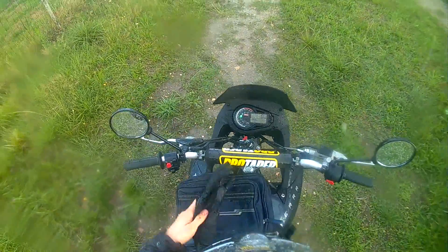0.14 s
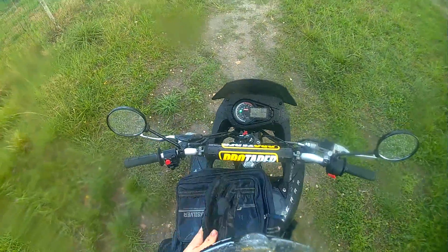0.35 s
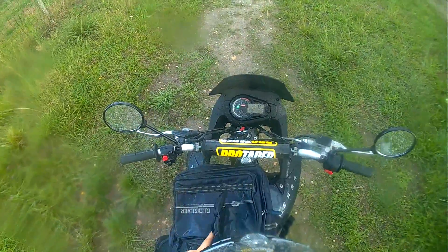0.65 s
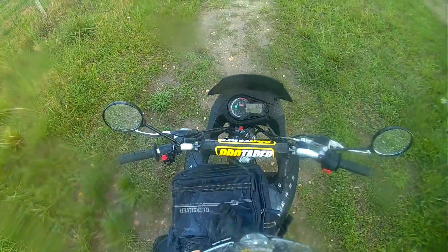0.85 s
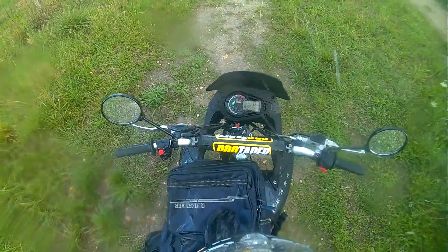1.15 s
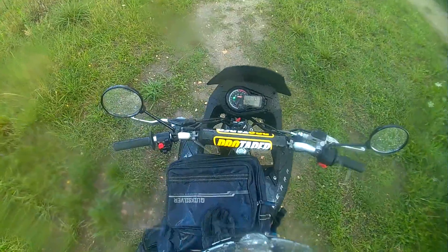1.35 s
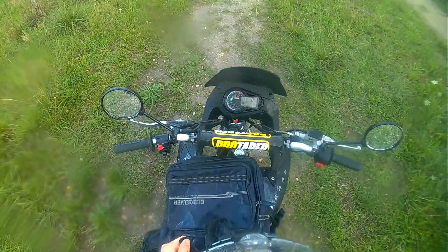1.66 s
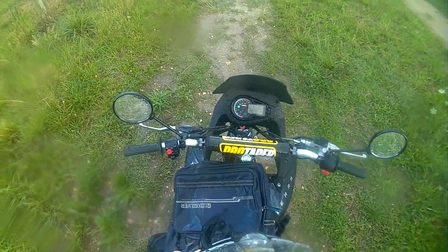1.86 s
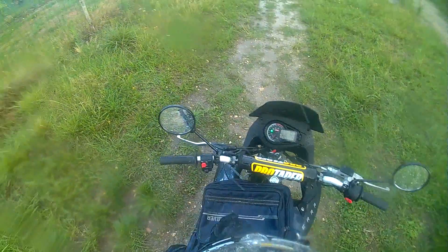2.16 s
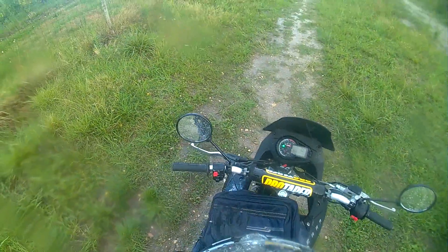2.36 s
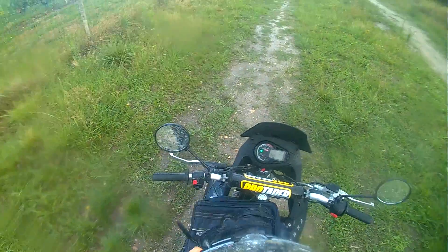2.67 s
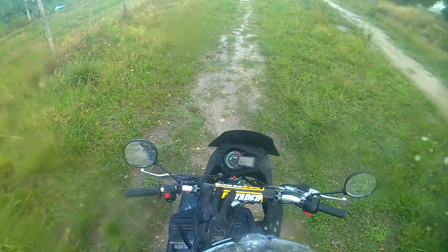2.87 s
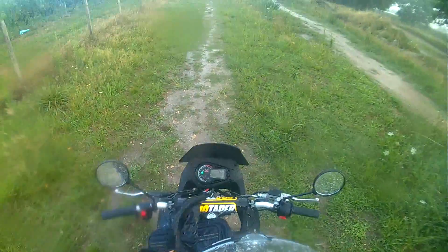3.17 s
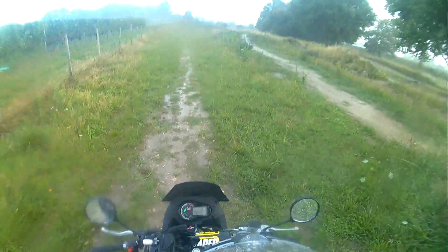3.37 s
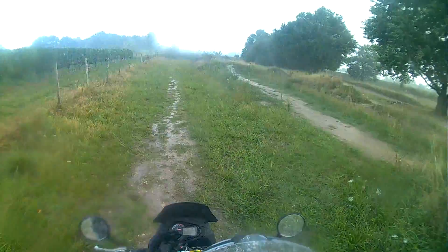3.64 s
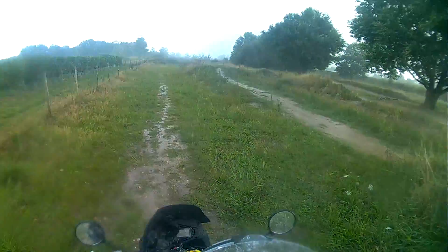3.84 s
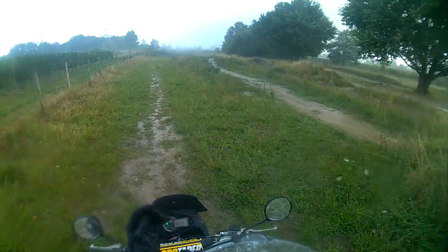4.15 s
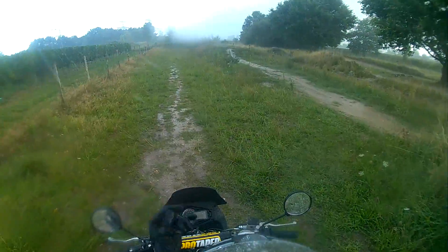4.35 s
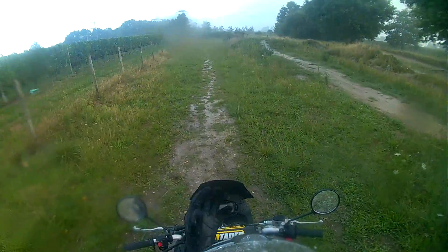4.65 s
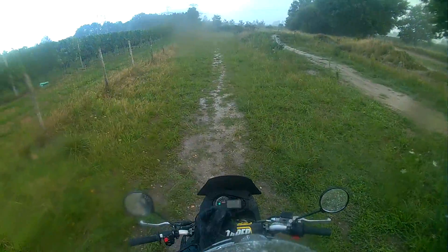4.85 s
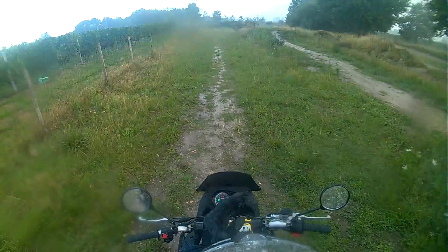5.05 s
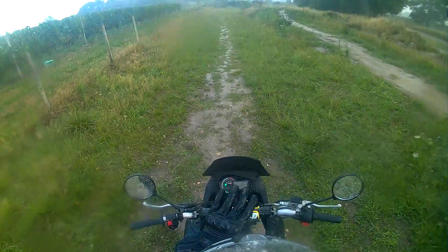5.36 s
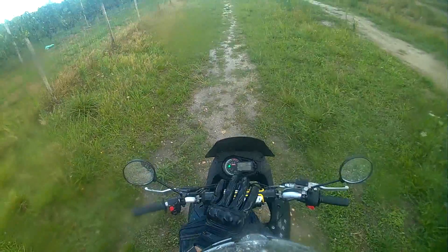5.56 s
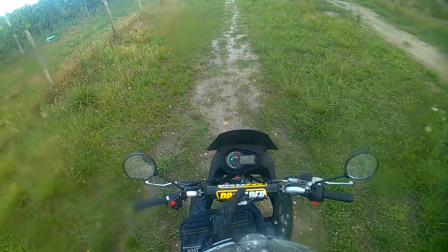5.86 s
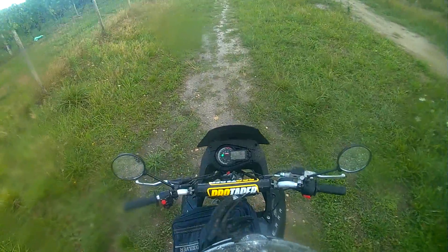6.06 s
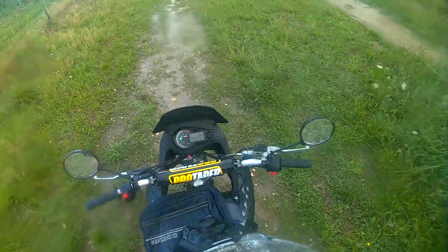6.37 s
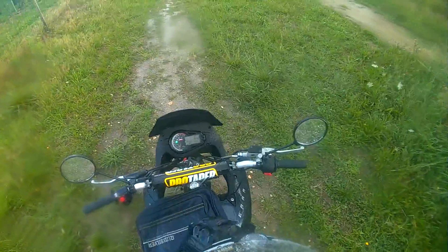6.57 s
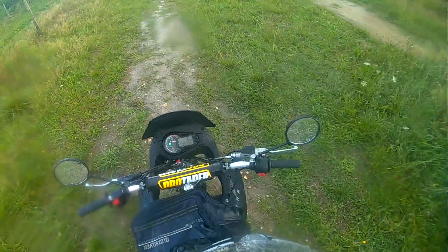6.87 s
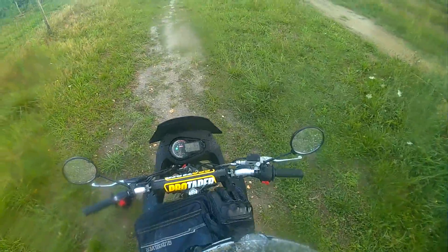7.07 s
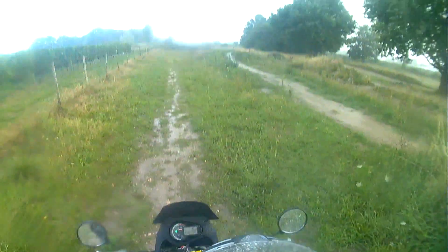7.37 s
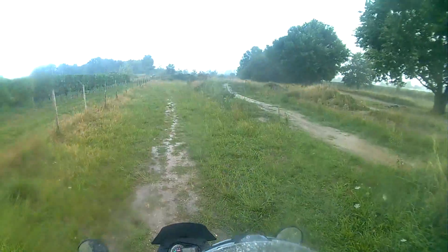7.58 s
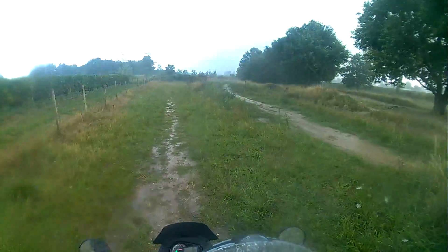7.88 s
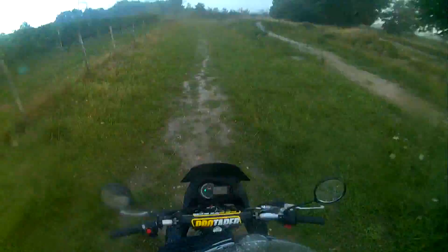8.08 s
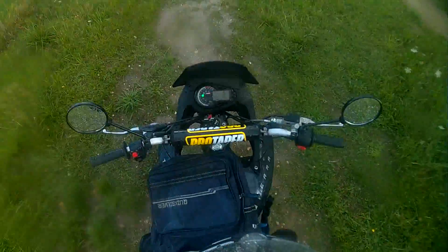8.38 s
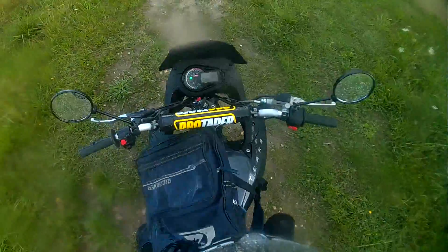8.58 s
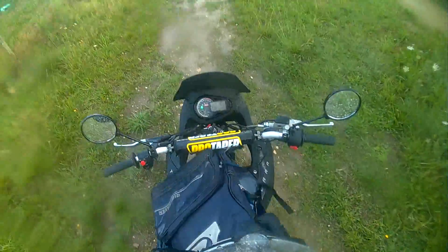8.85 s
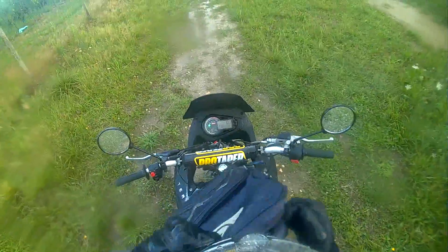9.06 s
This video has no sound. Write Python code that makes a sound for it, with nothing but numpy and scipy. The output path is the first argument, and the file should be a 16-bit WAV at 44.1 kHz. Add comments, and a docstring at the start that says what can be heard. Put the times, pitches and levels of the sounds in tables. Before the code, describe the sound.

A close, boxy shower of raindrops: resonant knocks on a helmet shell, sharper clicks on a plastic case, and low thuds under the heaviest drops. It peaks around two seconds, becomes thinner and softer through the middle, and ends as scattered tiny taps. Beneath lies a faint, dull, constant hiss of rain on a field. The sealed microphone removes most treble; the standing motorcycle is silent.

```python
"""In the open beside a field, rain strikes a rider's helmet and the waterproof camera case fixed to it.
Drops on the helmet excite the modes of its shell, with an overload thud under loud ones; drops on the
case give short hard ticks with a small thump. The crackling shower thins out to single taps
over a faint, steady wash of rain on grass. All of it is muffled by the case; the motorcycle stands silent."""
import sys
import numpy as np
from scipy import signal
from scipy.fft import rfft, irfft
from scipy.io import wavfile
from scipy.ndimage import uniform_filter1d, minimum_filter1d

SR = 44100
rng = np.random.default_rng(int(sys.argv[2]) if len(sys.argv) > 2 else 0)


def unload_audio(sound):
    """Save the sound as a 16-bit wav file, at the path given as the first command line argument."""
    columns = np.transpose(np.atleast_2d(sound))
    # keep every value between -1 and 1, then stretch to whole-number steps
    steps = np.round(np.clip(columns, -1, 1) * 32767)
    wavfile.write(sys.argv[1], SR, steps.astype(np.int16))


N = 406590
TAP_SIZE = 3072  # length of one tap [samples]


def amp(db):
    """Level law: converts decibels to an amplitude gain."""
    return 10 ** (np.asarray(db) / 20)


def read_spectrum(points, hz):
    """Spectral interpolation: joins levels in dB by straight lines on a log-frequency axis."""
    f, db = np.transpose(points)
    return np.interp(np.log(hz + 1), np.log(f + 1), db)


def unit(tap):
    """Energy normalisation: scales a tap to the energy of 10 ms at rms 1."""
    return tap / np.sqrt(np.sum(tap ** 2) / (SR / 100) + 1e-20)


def add(mix, time_s, sound):
    """Superposition: adds a sound to the mix in place, from the given time."""
    part = mix[max(round(time_s * SR), 0):][:len(sound)]
    part += sound[:len(part)]


def causal_response(points, patchy_db=0, fizz_db=0):
    """Minimum phase: the response starts sharply and rings afterwards; its spectrum varies at random."""
    hz, db = np.transpose(points)
    db = db + patchy_db * rng.standard_normal(len(hz))
    db = db + fizz_db * (hz > 5000)
    bins = abs(np.fft.fftfreq(TAP_SIZE, 1 / SR))
    log_gain = np.log(amp(read_spectrum(np.c_[hz, db], bins)))
    # the Hilbert transform of the log gain gives the phase
    return np.exp(np.conj(signal.hilbert(log_gain)))[:TAP_SIZE // 2 + 1]


def splash(decay_s, spray_db):
    """Impact force as a spectrum: an impulse, then a short noise that swells as the water spreads."""
    t = np.arange(TAP_SIZE) / SR
    spray = rng.standard_normal(TAP_SIZE) * np.sqrt(t) * np.exp(-t / decay_s)
    spray /= np.linalg.norm(spray)
    return rfft(t == 0) + amp(spray_db) * rfft(spray)


# Spectrum of rain on the field, heard through the case: (frequency [Hz], relative density [dB per Hz])
WASH_SPECTRUM = [(25, -31), (150, -19), (550, -2.5), (1100, 2), (2000, -6.5), (2400, -22.5), (2900, -35),
                 (4100, -31), (5000, -49), (15000, -49)]


def wash(level_db=-57):
    """Incoherent summation: countless far drops merge into a dull, even hiss of filtered noise."""
    gain = amp(read_spectrum(WASH_SPECTRUM, np.fft.rfftfreq(N, 1 / SR)))
    hiss = irfft(rfft(rng.standard_normal(N)) * gain, N)
    return amp(level_db) * hiss / hiss.std()


# Strength of the shower, its loudest patter before flurries: (time [s], level [dB])
SHOWER_STRENGTH = [(0, -18.5), (0.22, -28), (0.45, -24), (1.3, -28), (1.55, -20.5), (2.75, -25.5),
                   (2.82, -31.5), (3.1, -27), (4.3, -35.5), (4.55, -30.5), (5.6, -38.5), (6.4, -37),
                   (6.9, -42), (9.2, -42.5)]


def shower_patter(full_db=-21, halving_db=15, range_db=24, flurry_db=2.5, slot_s=.007):
    """Random arrivals: at most one drop a slot, in flurries, sparser and softer as the shower eases."""
    out = np.zeros(N)
    # the drop levels given here set only the treble, since each tap is normalised
    on_helmet = [unit(helmet_tap(-32.5, -6 + 6 * z)) for z in rng.standard_normal(100)]
    on_case = [unit(case_tap(-30.5, 1530 * np.exp(.24 * z))) for z in rng.standard_normal(20)]
    chance, delay, smallness, place, aim = rng.random((int(N / SR / slot_s), 5)).T
    times = (np.arange(len(chance)) + delay) * slot_s
    flurry = uniform_filter1d(rng.standard_normal(len(times)), size=4)
    top_db = np.interp(times, *np.transpose(SHOWER_STRENGTH))
    top_db += flurry_db * np.tanh(flurry / flurry.std())
    # the chance of a drop halves for each halving_db below full_db
    lands = chance < 2 ** ((top_db - full_db) / halving_db)
    for i in np.flatnonzero(lands):
        db = top_db[i] - range_db * smallness[i]
        # a fifth of the louder ones are direct hits on the case
        taps = on_case if db > -34 and aim[i] < .2 else on_helmet
        add(out, times[i], amp(db) * taps[int(place[i] * len(taps))])
    return out


# Spectrum of the low thump: (frequency [Hz], relative level [dB])
THUMP_SPECTRUM = [(20, -39), (130, -8.5), (240, -2.5), (600, 6.5), (1000, -12), (2500, -53), (5000, -81.5)]


def low_thump(force, patchy_db):
    """Forced response: the force of the splash is filtered to a dull thump."""
    return unit(irfft(force * causal_response(THUMP_SPECTRUM, patchy_db)))


# Spectrum of the tick at the usual 1530 Hz centre: (frequency [Hz], relative level [dB])
TICK_SPECTRUM = [(60, -43.5), (400, -16), (800, -6), (1250, 4.5), (1600, 2), (2100, -7.5), (2850, -31),
                 (3400, -25), (4000, -29.5), (4650, -43), (5100, -66), (7000, -61.5), (9500, -49),
                 (15000, -71)]


def case_tick(force, shift, ring_hz=1690, ring_t60=.017, ring_db=-7):
    """Impact and resonance: a hard tick with one brief mode; the landing place shifts both in pitch."""
    t = np.arange(TAP_SIZE) / SR
    hz, db = np.transpose(TICK_SPECTRUM)
    # only the part below 2500 Hz moves in full, the mode by the square root
    moved_hz = hz * shift ** (hz < 2500)
    response = causal_response(np.c_[moved_hz, db], patchy_db=3.5)
    mode = amp(-60 * t / ring_t60) * np.cos(2 * np.pi * ring_hz * np.sqrt(shift) * t)
    tick = unit(irfft(force * response))
    ring = unit(irfft(rfft(mode) * response))
    return unit(tick + amp(ring_db) * ring)


def case_tap(db, centre_hz, usual_hz=1530, gain_db=3):
    """Direct impact: tick and thump of the case, with a weaker tap of the helmet beneath it."""
    shift = centre_hz / usual_hz
    force = splash(decay_s=.0012, spray_db=-1)
    # where the wall is softer the tick is lower and thumps more
    thump_db = -16.5 - 7 * np.log2(shift)
    hit = case_tick(force, shift) + amp(thump_db) * low_thump(force, patchy_db=2.5)
    return amp(db + gain_db) * hit + helmet_tap(db - 16, bright_db=-6)


# Drops heard singly on the camera case: (time [s], level over 10 ms before the 3 dB gain of case_tap [dB],
# nominal centre of the tick [Hz])
SINGLE_CASE_DROPS = [(0.761, -10.5, 1430), (0.92, -20.5, 1490), (0.967, -15, 1580), (1.142, -25, 1494),
                     (1.501, -18, 1510), (1.635, -22.5, 1700), (1.709, -20, 1630), (1.803, -24.5, 1490),
                     (2.057, -15, 1530), (2.36, -24.5, 1670), (2.404, -7, 1580), (2.668, -13, 1490),
                     (3.165, -25.5, 1550), (3.458, -20, 1530), (3.651, -25.5, 1400), (3.77, -25, 1350),
                     (3.954, -29.5, 1540), (4.121, -29.5, 1890), (4.268, -25, 1540), (4.485, -24, 1450),
                     (4.661, -27.5, 1520), (4.734, -20, 1670), (4.924, -30, 1490), (5.216, -36, 1500),
                     (5.223, -23.5, 1560), (5.498, -27, 1715), (5.763, -28, 1830), (6.026, -30, 1190),
                     (6.046, -33.5, 1890), (6.102, -28.5, 1420), (6.224, -30, 1390), (6.364, -34.5, 1480),
                     (7.311, -31, 1650), (7.313, -26.5, 1230), (7.564, -31, 1350), (8.775, -35.5, 1510),
                     (9.094, -31.5, 1480), (9.179, -29.5, 1540)]


def single_case_drops():
    """Superposition of direct impacts: drops heard singly on the case itself."""
    out = np.zeros(N)
    for time_s, db, centre_hz in SINGLE_CASE_DROPS:
        add(out, time_s, case_tap(db, centre_hz))
    return out


def case_wall(ring, low_hz=480, high_hz=2400):
    """Transmission: the case lets only the middle of the shell's ring through."""
    return signal.lfilter(*signal.butter(3, [low_hz, high_hz], "bandpass", fs=SR), ring)


# Modes of the helmet shell before detuning and tilt: (frequency [Hz], relative level [dB], t60 [s])
SHELL_MODES = [(836.3, -8.5, 0.08), (938.5, -3.5, 0.079), (1010, -3, 0.069), (1106.3, 2.5, 0.059),
               (1183.4, 0.5, 0.037), (1233, -3.5, 0.027), (1302.5, -4.5, 0.064), (1740, -33.5, 0.014),
               (1900, -26, 0.082), (1850, -11.5, 0.083), (2240, 0.5, 0.016)]


def shell_ring(bright_db, scatter=.012, upper_share=.65):
    """Modal synthesis: decaying sines, each excited and detuned according to the landing place."""
    t = np.arange(TAP_SIZE) / SR
    hz, mode_db, t60 = np.transpose(SHELL_MODES)[:, :, None]
    place, detune = rng.standard_normal((2, len(SHELL_MODES), 1))
    # brighter drops favour the upper modes
    tilt_db = upper_share * bright_db * np.log2(hz / hz[0])
    strength = np.tanh(2 * place) * amp(mode_db + tilt_db)
    modes = strength * amp(-60 * t / t60) * np.sin(2 * np.pi * hz * (1 + scatter * detune) * t)
    return unit(case_wall(np.sum(modes, axis=0)))


# Spectrum of the smack of a drop on the helmet, heard through the case: (frequency [Hz], relative level [dB])
SMACK_SPECTRUM = [(30, -40), (250, -14.5), (650, -14.5), (1100, -4.5), (1900, 1), (2250, -7), (2800, -20.5),
                  (4100, -26), (4700, -38), (5100, -56), (7000, -59.5), (8300, -48.5), (11500, -50),
                  (15000, -66)]


def helmet_smack(db, spot_hz=1750, spot_spread=.18, half_width_hz=130, spot_db=7):
    """Impact spectrum: a splash coloured by the path and by a short resonance of the struck spot."""
    bins = np.fft.rfftfreq(TAP_SIZE, 1 / SR)
    # harder blows reach further into the treble
    colour = causal_response(SMACK_SPECTRUM, patchy_db=1.5, fizz_db=.5 * (db + 25))
    centre_hz = spot_hz * (1 + spot_spread * rng.standard_normal())
    spot = 1 + amp(spot_db) / (1 + 1j * (bins - centre_hz) / half_width_hz)
    return unit(irfft(splash(decay_s=.0023, spray_db=12) * colour * spot))


def helmet_tap(db, bright_db):
    """Impact plus modal response: bright_db sets the smack against the ring, db the whole tap."""
    return amp(db) * unit(shell_ring(bright_db) + amp(bright_db) * helmet_smack(db))


def overload_thump(db, firm_db=-21, below_db=-17):
    """Overload: a low thud under loud taps, rising steeply with level up to firm_db, slowly above."""
    excess_db = db - firm_db
    level_db = firm_db + below_db + 3.4 * min(excess_db, 0) + .5 * max(excess_db, 0)
    return amp(level_db) * low_thump(splash(decay_s=.003, spray_db=3), patchy_db=3)


# Drops on the helmet that stand out singly, from loud to faint:
# (time [s], level of the tap over 10 ms [dB], smack against ring of the shell [dB])
SINGLE_HELMET_DROPS = [(0.019, -20, 2.5), (0.105, -19, -8.5), (0.283, -22, -15), (0.291, -16, 1),
                       (0.395, -12, -4), (0.422, -15.5, 2.5), (0.513, -13.7, -16), (0.696, -21, -7.5),
                       (0.823, -16.5, -6.5), (0.87, -14.5, -10.2), (0.889, -13.5, -15.5), (1.05, -18.5, -8),
                       (1.082, -18, -14), (1.234, -16.5, -16.5), (1.483, -19.5, -10), (1.551, -18.5, -9.5),
                       (1.679, -15.2, -11), (1.741, -15, -10.5), (1.946, -20, 2), (2.011, -16, -10),
                       (2.071, -6, -12), (2.166, -17, -11.5), (2.253, -16, -15), (2.278, -15.5, -10),
                       (2.298, -22.5, -0.5), (2.637, -21, -9), (2.711, -22, -2), (2.745, -18, 0.5),
                       (2.951, -26, -8), (3.009, -23.5, -5.5), (3.076, -28.5, 2.5), (3.111, -26.5, -5),
                       (3.185, -28.5, -14.5), (3.426, -28.0, -11), (3.704, -27.5, -11), (3.867, -31.5, 1),
                       (3.972, -23, 0.8), (4.231, -25, -10.5), (4.322, -32.5, 4), (4.538, -17.5, -11),
                       (4.847, -31.5, -1), (4.995, -31, -5.5), (5.244, -31.5, 6), (5.281, -25, -1),
                       (5.333, -28.0, -14.5), (5.413, -38, 5), (5.443, -34, 3.1), (5.639, -29.5, -10),
                       (5.669, -29, -11), (5.892, -38, -1), (6.16, -35.5, -2), (6.307, -35.5, -4),
                       (6.754, -40, -5), (6.894, -43.5, -0.8), (7.219, -41.5, -18), (7.421, -35.5, -6.5),
                       (7.618, -36, 4.0), (7.68, -41, -1), (7.8, -39, 0.5), (7.942, -39.5, -4),
                       (8.158, -33, -15.8), (8.268, -39, -8), (8.622, -41, -3.7), (8.993, -38.5, -13)]


def single_helmet_drops():
    """Superposition of impacts: each drop taps the helmet, and loud ones add a low thud."""
    out = np.zeros(N)
    for time_s, db, bright_db in SINGLE_HELMET_DROPS:
        add(out, time_s, helmet_tap(db, bright_db) + overload_thump(db))
    return out


def scene():
    """Superposition: all the rain summed at one microphone."""
    return (wash() + shower_patter() + single_case_drops() + single_helmet_drops())[None]


def record(dry, knee_db=-10.5, edge_hz=15700):
    """Gain reduction and band limiting: a fast, soft limiter rounds off the hardest hits, then a low-pass."""
    gain = (1 + (dry / amp(knee_db)) ** 4) ** -.25
    gain = minimum_filter1d(gain, size=70)
    gain = uniform_filter1d(uniform_filter1d(gain, size=36), size=36)
    low_pass = signal.firwin(511, edge_hz, window=("kaiser", 9), fs=SR)
    return signal.oaconvolve(dry * gain, low_pass[None], "same")


dry = scene()
out = record(dry)
unload_audio(out)
```